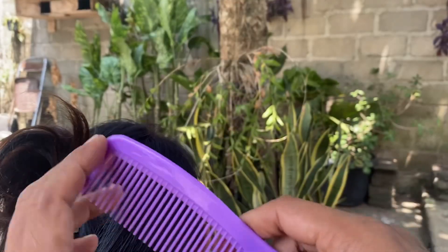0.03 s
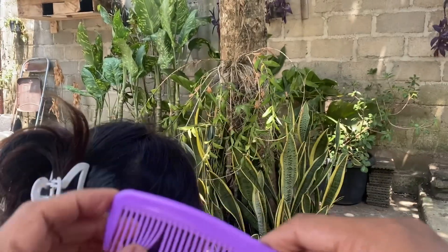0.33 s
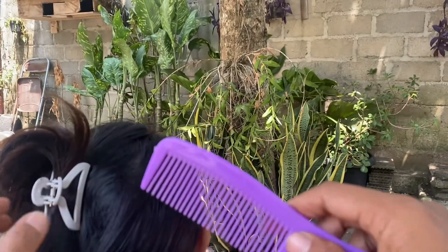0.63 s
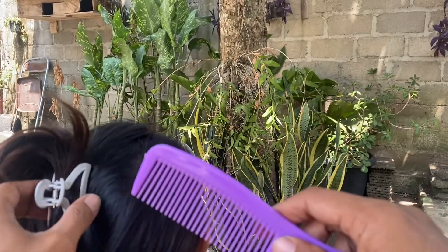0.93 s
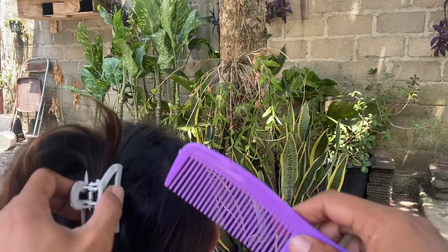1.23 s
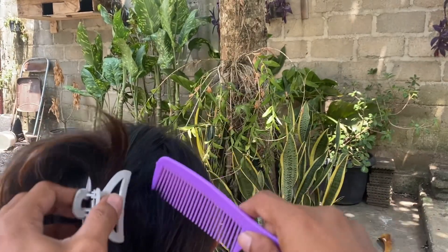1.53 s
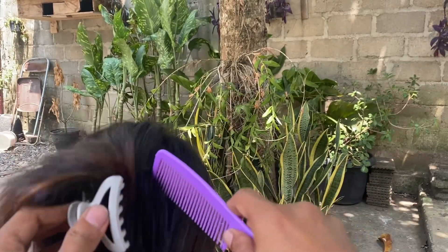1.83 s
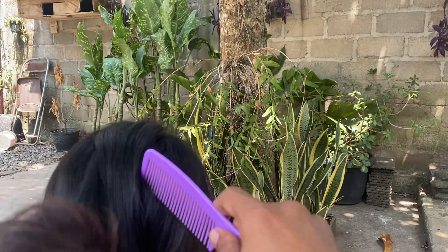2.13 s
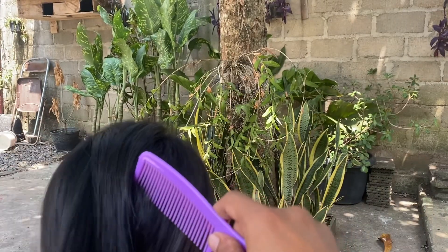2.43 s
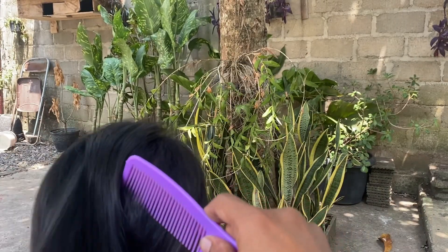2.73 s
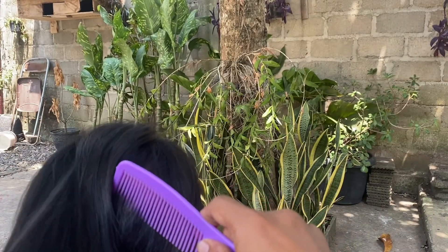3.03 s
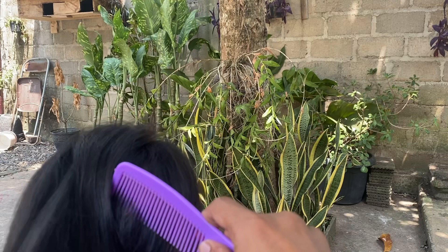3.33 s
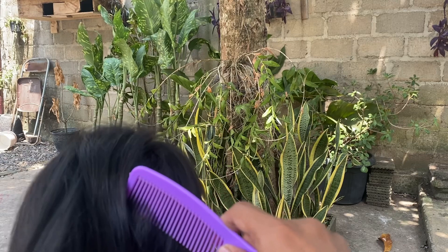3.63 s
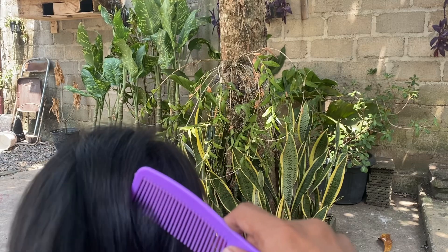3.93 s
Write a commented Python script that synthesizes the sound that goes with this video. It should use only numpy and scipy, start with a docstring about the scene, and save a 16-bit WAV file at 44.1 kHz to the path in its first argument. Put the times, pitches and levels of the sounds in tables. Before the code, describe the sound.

Close up in a garden, the teeth of a plastic comb click in one brief, rapid run under a finger. Very soft swishes of hair being combed follow, while far traffic hums and a low engine drone grows louder.

```python
"""A walled garden. Close up, a fingertip runs along a plastic comb: each tooth drags on the skin,
snaps free and knocks the comb's back. Then the comb is drawn softly through long hair, which
hisses, swishes and sizzles on the teeth. Far off, two engines drone and beat against each other
over a wash of traffic and a wavering motor; a thin high tone, perhaps an insect, hangs behind."""
import sys
import numpy as np
from scipy import signal
from scipy.fft import rfft, irfft
from scipy.io import wavfile

SR = 44100
rng = np.random.default_rng(int(sys.argv[2]) if len(sys.argv) > 2 else 0)


def unload_wav(signal):
    """Save mono or channel-first audio to the path in sys.argv[1] as 16-bit WAV at rate SR, clipped to [-1, 1]."""
    wavfile.write(
        sys.argv[1],
        SR,
        np.round(np.clip(np.atleast_2d(signal).T, -1, 1) * 32767).astype(np.int16),
    )


N = 176400
TIME = np.arange(N) / SR
BIN_HZ = np.maximum(np.arange(N // 2 + 1) * SR / N, 1)

# tone colour of the traffic bed: f/Hz, relative level/dB
TRAFFIC_SPECTRUM = [(20, -18), (35, -1.5), (60, 5.5), (90, -2), (120, -3.5), (170, -13), (235, -11),
                    (275, -14), (320, -12.5), (400, -15), (540, -20), (700, -22), (850, -22.5),
                    (1400, -28.5), (2600, -34), (3700, -41), (5300, -43), (8000, -58.5), (10500, -81),
                    (16000, -89.5)]
# slow swell of the traffic's mids and highs: t/s, gain/dB
TRAFFIC_SWELL = [(0, 2), (.8, -.5), (1.6, 0.5), (2.2, 2.5), (2.7, 1.5), (3.1, -0.5), (4, 1)]
# stereo image of the traffic: f/Hz, left-right correlation
TRAFFIC_CORRELATION = [(60, 0.96), (130, 0.9), (290, 0.58), (640, -0.017), (1400, -0.019), (3100, 0.16),
                       (7000, -0.047)]
# firing note of the steady engine: t/s, f/Hz, level/dB
STEADY_ENGINE = [(0, 66.96, -40), (.28, 67.3, -46), (.55, 66.75, -34.5), (1.0, 64.56, -38.5),
                 (1.2, 65.4, -34), (1.58, 65.9, -29.5), (1.85, 66.0, -43), (2.12, 65.33, -41),
                 (2.25, 64.98, -32.5), (2.45, 65.72, -37), (2.7, 65.7, -25.5), (3.1, 65.1, -21),
                 (3.37, 64.95, -25.5), (3.5, 67.5, -37), (3.6, 65.6, -25), (3.76, 64.56, -31),
                 (3.87, 66.9, -25)]
# firing note of the engine that gathers speed and fades: t/s, f/Hz, level/dB
RISING_ENGINE = [(0, 47.96, -37), (.2, 46.95, -40), (.45, 48.04, -44.5), (.6, 48.6, -38),
                 (1.15, 49.64, -37), (1.6, 52.63, -43), (1.8, 52.52, -37), (2.25, 54.35, -36),
                 (2.6, 55.3, -42.5), (3.0, 54.83, -66.5)]
# envelope of skin, then hair, sliding over the teeth: t/s, relative level/dB
HISS_ENVELOPE = [(0, -101), (.04, -83), (.42, -75.5), (.56, -99), (1.15, -92.5), (1.23, -84.5),
                 (1.42, -89.5), (1.73, -77.5), (2.02, -83.5), (2.33, -79.5), (2.43, -91), (2.57, -77.5),
                 (3.04, -76), (3.23, -79.5), (3.35, -73.5), (3.57, -73.5), (3.72, -79), (3.87, -74.5),
                 (4, -88)]
# tone colour of that hiss: f/Hz, relative level/dB
HISS_SPECTRUM = [(2000, 1.5), (4000, -0.5), (7300, -1), (9000, -2), (12000, 2.5), (13600, -1), (15200, 1.5),
                 (16300, -12)]
# the comb digs into the hair: centre t/s, length/s, level/dB
DEEP_STROKES = [(1.87, 0.22, -72.5), (2.73, 0.32, -68.5), (3.5, 0.76, -77)]
# tone colour of a deep stroke: f/Hz, relative level/dB
SWISH_SPECTRUM = [(2000, -20), (3600, -3), (5000, 6.5), (6500, 2), (8500, -19.5), (16000, -22.5)]
# taut strands sizzle on the teeth: centre t/s, length/s, level/dB, f/Hz
TAUT_STRANDS = [(2.3, .12, -75, 14570), (3.0, .3, -73, 15100), (3.42, .25, -76.5, 15090),
                (3.85, .1, -71, 14740)]
# a strand catches on a tooth: t/s, level/dB, f/Hz
STRAND_CATCHES = [(1.514, -64, 5860), (3.555, -59, 14660)]
# reflections off the hand and head: delay/s, level/dB
CLOSE_REFLECTIONS = [(.00235, -11.5), (.0048, -19.5)]
# modes of the comb's back: f/Hz, width/Hz, relative level/dB, left minus right/dB
BACK_MODES = [(229, 136, 4.5, 2), (440, 204, 4.5, 4), (680, 79, 10, 9), (1135, 230, -2.5, 8),
              (1520, 180, 2.5, 9.5), (1866, 160, 0, 6), (2610, 670, -9, 13)]
# a tooth snaps free: t/s, level/dB of body, clack, snap and bright edge, drag/s, tooth f/Hz
TOOTH_SNAPS = [(.0900, -50, -55, -35.5, -49, .0005, 10800), (0.101, -48, -55, -38, -50, .0005, 11200),
               (0.112, -42, -61, -44, -44, .0004, 11000), (0.1344, -31, -40, -31, -41, 0.00065, 7300),
               (0.161, -23.5, -28, -16, -21, 0.0013, 6940), (0.186, -21, -39, -18, -26, 0.00057, 7100),
               (0.2158, -16.5, -25.5, -17, -23, 0.0006, 7400),
               (0.2419, -16, -36, -16.5, -23, 0.00031, 7700),
               (0.2582, -17.5, -30, -18.5, -14, 0.00014, 7600),
               (0.2714, -20, -30.5, -17, -10.5, 0.00062, 7700), (0.2821, -17, -32, -17, -17, .0002, 7700),
               (0.2927, -21.5, -29, -19, -17.5, .0003, 7600), (0.3087, -16.5, -24, -17.5, -23, .0004, 8550),
               (0.3213, -19, -30, -15.5, -28, 0.00074, 8600), (0.3391, -23.5, -32, -20, -27, .0012, 8100),
               (0.3647, -23, -27, -21, -26, 0.00081, 9800), (0.39, -28, -36, -20, -24, 0.0005, 10200),
               (0.4047, -27.5, -44, -22.5, -25, 0.00049, 10300), (0.4135, -33, -32, -22, -29, .0008, 9600),
               (0.421, -40, -32.5, -31, -34, 0.00064, 10500)]


def from_db(db):
    return 10 ** (np.asarray(db) / 20)


def rms_one(x):
    return x / np.sqrt(np.mean(x ** 2) + 1e-20)


def energy_one(x):
    return x / np.sqrt(np.sum(np.atleast_2d(x) ** 2, axis=1).mean() + 1e-20)


def automation(rows):
    """Each column of a breakpoint curve, at every sample."""
    times, *columns = np.transpose(rows)
    return [np.interp(TIME, times, column) for column in columns]


def per_bin(points):
    """A curve over log frequency, read at every FFT bin."""
    hz, value = np.transpose(points)
    return np.interp(np.log(BIN_HZ), np.log(hz), value)


def pan(db):
    """Channel gains for a level difference; positive leans left."""
    return from_db(np.array([[db], [-db]]) / 2)


def add(out, sound, s):
    """Drops a short sound into the mix at a time."""
    i = max(int(s * SR), 0)
    out[:, i:i + sound.shape[1]] += sound[:, :N - i]


def band(x, low_hz, high_hz):
    return signal.sosfilt(signal.butter(2, [low_hz, high_hz], "band", fs=SR, output="sos"), x)


def resonate(x, hz, width_hz):
    """A resonance with unity gain at its peak."""
    r = np.exp(-np.pi * width_hz / SR)
    poles = [1, -2 * r * np.cos(2 * np.pi * hz / SR), r * r]
    return signal.lfilter(np.array([1, 0, -1]) * (1 - r * r) / 2, poles, x)


def drift(rate_hz):
    """A smooth random modulator, rms 1."""
    hop, run_in = 40, 2000
    r = np.exp(-2 * np.pi * rate_hz * hop / SR)
    noise = rng.standard_normal(N // hop + run_in + 2)
    slow = signal.lfilter([1], [1, -2 * r, r * r], noise)[run_in:]
    return np.interp(np.arange(N) / hop, np.arange(len(slow)), rms_one(slow))


def swell(centre_s, length_s):
    """A bell-shaped rise to 1 and fall."""
    return np.exp(-(2 * (TIME - centre_s) / length_s) ** 2)


def coloured(noise, spectrum):
    """Noise EQed to a spectrum and cut an octave below its first point; rms 1."""
    gain = from_db(per_bin(spectrum)) * (BIN_HZ > spectrum[0][0] / 2)
    return rms_one(irfft(rfft(noise) * gain, N))


def stereo_noise(correlation):
    """White noise with a left-right correlation, overall or per bin."""
    mid, side = rfft(rng.standard_normal((2, N)))
    spectrum = np.sqrt(1 + correlation) * mid + np.sqrt(1 - correlation) * side * [[1], [-1]]
    return rms_one(irfft(spectrum, N))


def narrow_noise(hz, width_hz):
    """A narrow noise band whose centre may move; rms 1."""
    slow = signal.sosfilt(signal.butter(2, width_hz / 2, fs=SR, output="sos"), rng.standard_normal(N))
    return rms_one(slow * np.cos(2 * np.pi * np.cumsum(hz * np.ones(N)) / SR))


def traffic(level_db=-42, crossover_hz=450, flicker_db=1.6):
    """A dull, wide bed: the rumble flickers, the range above it swells slowly."""
    wash = coloured(stereo_noise(per_bin(TRAFFIC_CORRELATION)), TRAFFIC_SPECTRUM)
    low = signal.sosfiltfilt(signal.butter(2, crossover_hz, fs=SR, output="sos"), wash)
    swell_db, = automation(TRAFFIC_SWELL)
    rumble = low * from_db(flicker_db * drift(12))
    upper = (wash - low) * from_db(swell_db) * pan(1.3)
    return from_db(level_db) * (rumble + upper) * pan(1)


def insect(level_db=-77.5, centre_hz=5390, waver_hz=17):
    """A thin, faint tone that wavers slightly."""
    hz = centre_hz + waver_hz * np.array([drift(60), drift(60)])
    return from_db(level_db) * rms_one(np.sin(2 * np.pi * np.cumsum(hz, axis=1) / SR))


def motor(level_db=-60.5, centre_hz=337.2, waver_hz=24.06, flicker_db=3.5):
    """A far motor whose note wavers and comes and goes."""
    phase = 2 * np.pi * np.cumsum(centre_hz + waver_hz * drift(3)) / SR
    note = np.sin(phase) * from_db(flicker_db * drift(7))
    return from_db(level_db) * rms_one(note) * pan(1)


def engine(curve, octave_db=-45.5):
    """From far away only the firing note of an exhaust arrives, with a trace of its octave."""
    hz, db = automation(curve)
    phase = 2 * np.pi * np.cumsum(hz) / SR
    note = np.sin(phase) + from_db(octave_db) * np.sin(2 * phase)
    return np.sqrt(2) * from_db(db) * note * pan(2.1)


def sliding_hiss(gain_db=9.5, flicker_db=1.33, ticks_per_s=1100, tick_db=-7.5):
    """Skin, then hair, slides over the teeth: a fine, centred hiss grained with tiny ticks."""
    envelope_db, = automation(HISS_ENVELOPE)
    ticks = rms_one((rng.random(N) < ticks_per_s / SR) * rng.standard_normal(N))
    hiss = coloured(stereo_noise(correlation=1) + from_db(tick_db) * ticks, HISS_SPECTRUM)
    return hiss * from_db(gain_db + envelope_db + flicker_db * drift(54))


def hair_swishes(rest_hz=4430, rise_hz=896, ring_db=-5):
    """The comb digs in: a swish with a resonance that climbs and falls with the pressure."""
    out = np.zeros((2, N))
    for s, length_s, db in DEEP_STROKES:
        pressure = swell(s, length_s)
        ring = narrow_noise(rest_hz + rise_hz * pressure, width_hz=1000)
        swish = coloured(stereo_noise(correlation=0.55), SWISH_SPECTRUM)
        out += from_db(db) * pressure * (swish + from_db(ring_db) * ring)
    return out * pan(3.5)


def hair_sizzles(flicker_db=3):
    """Taut strands sizzle on the teeth in flickering swells of very high noise."""
    out = np.zeros(N)
    for s, length_s, db, hz in TAUT_STRANDS:
        envelope = from_db(db + flicker_db * drift(80)) * swell(s, length_s)
        out += envelope * narrow_noise(hz, width_hz=730)
    return out


def hair_catches(decay_s=0.0081):
    """A strand catches on a tooth with a short, pitched tick."""
    out = np.zeros((2, N))
    t = TIME[:SR // 20]
    for s, db, hz in STRAND_CATCHES:
        ring = rms_one(resonate(rng.standard_normal((2, len(t))), hz, width_hz=780))
        add(out, from_db(db) * ring * np.exp(-t / decay_s), s)
    return out


def garden_reflections(x, t60_s=.035, scatter_db=-18):
    """Adds slaps off hand and head, then a faint short scatter from plants and walls."""
    t = TIME[:SR // 4]
    tail = energy_one(rng.standard_normal((2, len(t))) * from_db(-60 * t / t60_s))
    slaps = sum(from_db(db) * np.roll(x, round(s * SR), axis=-1) for s, db in CLOSE_REFLECTIONS)
    return x + slaps + from_db(scatter_db) * signal.fftconvolve(x, tail, axes=1)[:, :N]


def from_the_right(x, lag_s=.000235, low_hz=6900, high_hz=15500):
    """The comb's treble reaches the left microphone a moment later than the right."""
    above_hz = np.clip(BIN_HZ, low_hz, high_hz) - low_hz
    left = irfft(rfft(x[0]) * np.exp(-2j * np.pi * above_hz * lag_s), N)
    return np.array([left, x[1]])


def tooth_contact(t, click, drag_s, release_s=.0003, friction_share=0.68):
    """A tooth drags on the skin: friction builds to the click at t = 0 and dies after the release."""
    friction = rng.standard_normal(len(t)) * np.exp(-np.abs(t) / np.where(t < 0, drag_s, release_s))
    return np.sqrt(friction_share) * energy_one(friction) + np.sqrt(1 - friction_share) * click


def comb_back(click, spread_db=3):
    """The release rings the comb's back; each tooth stirs the modes differently."""
    body = np.zeros((2, len(click)))
    for k, (hz, width_hz, db, pan_db) in enumerate(BACK_MODES):
        gain = (-1) ** k * from_db(db + spread_db * rng.standard_normal())
        body += gain * resonate(click, hz, width_hz) * pan(pan_db)
    return body


def comb_teeth(clack_hz=4990, clack_width_hz=1960, clack_spread=0.081, ring_db=6):
    """Every tooth scrapes and rings briefly at its own pitch; its release knocks the comb's back."""
    out = np.zeros((2, N))
    t = (np.arange(2048) - 256) / SR   # pre-roll leaves room for the drag
    click = 1.0 * (t == 0)
    for s, body_db, clack_db, snap_db, edge_db, drag_s, tooth_hz in TOOTH_SNAPS:
        contact = tooth_contact(t, click, drag_s)
        body = comb_back(click)
        centre_hz = clack_hz * (1 + clack_spread * rng.standard_normal())
        clack = band(contact, centre_hz - clack_width_hz / 2, centre_hz + clack_width_hz / 2)
        ring = from_db(ring_db) * resonate(contact, tooth_hz, width_hz=1500)
        snap = band(contact, low_hz=7000, high_hz=13000) + ring
        edge = band(contact, low_hz=13300, high_hz=15900)
        knock = from_db(body_db) * energy_one(body) + from_db(clack_db) * energy_one(clack) * pan(7.5)
        tip = from_db(snap_db) * energy_one(snap) - from_db(edge_db) * energy_one(edge)
        add(out, knock + tip * pan(.3), s + t[0])
    return out


def scene():
    """The close comb and hair in front of the distant bed."""
    teeth = garden_reflections(comb_teeth())
    hair = sliding_hiss() + hair_swishes() + hair_sizzles() + hair_catches()
    bed = traffic() + motor() + insect() + engine(STEADY_ENGINE) + engine(RISING_ENGINE)
    return bed + from_the_right(teeth + hair)


def record(dry):
    """A steep high cut at 16.1 kHz."""
    return signal.sosfilt(signal.ellip(10, .2, 80, 16100, fs=SR, output="sos"), dry)


dry = scene()
out = record(dry)
unload_wav(out)
```